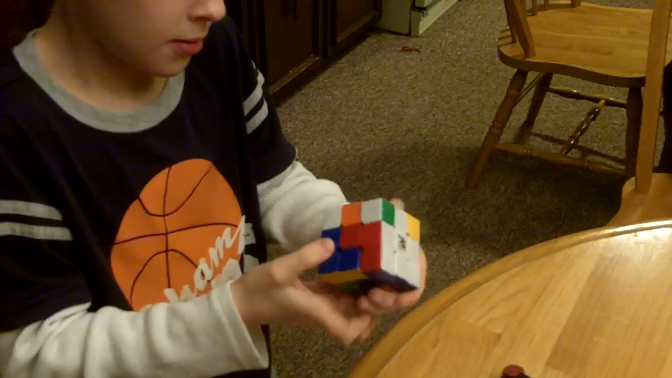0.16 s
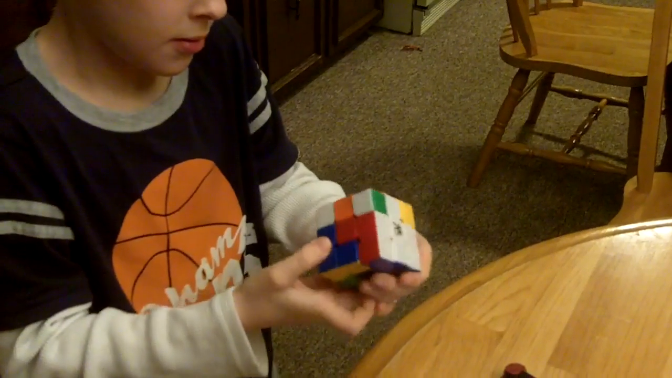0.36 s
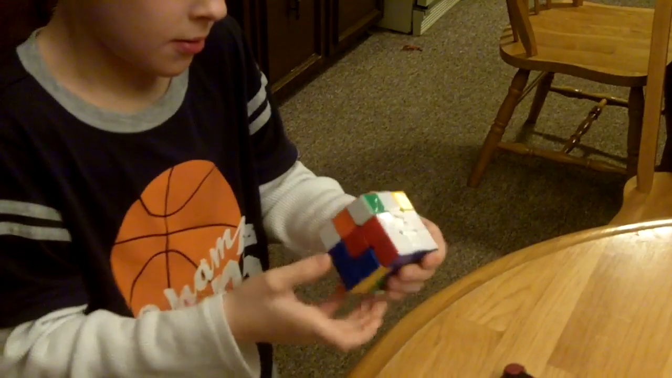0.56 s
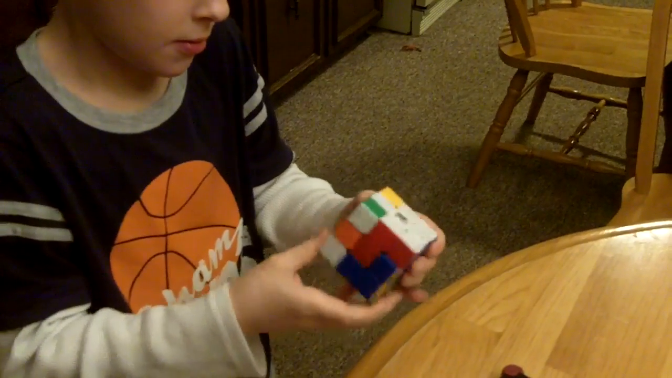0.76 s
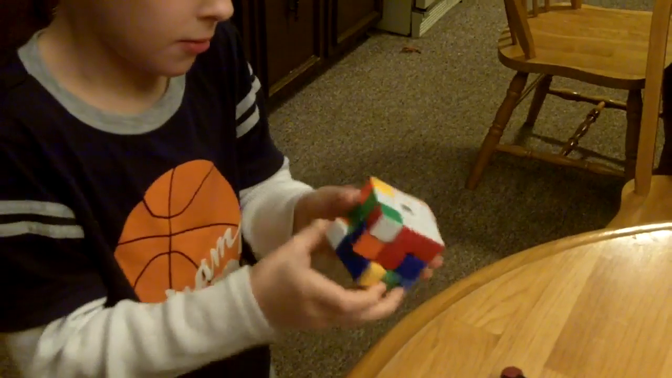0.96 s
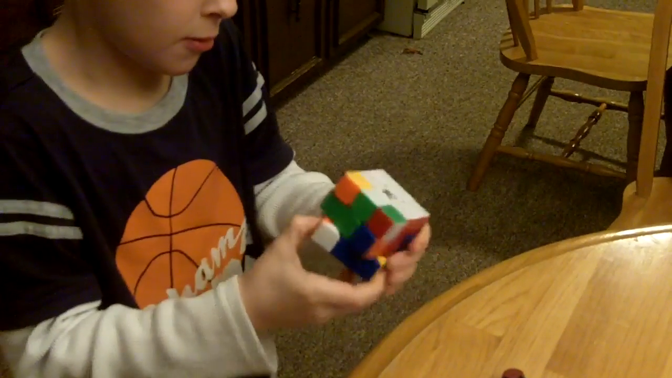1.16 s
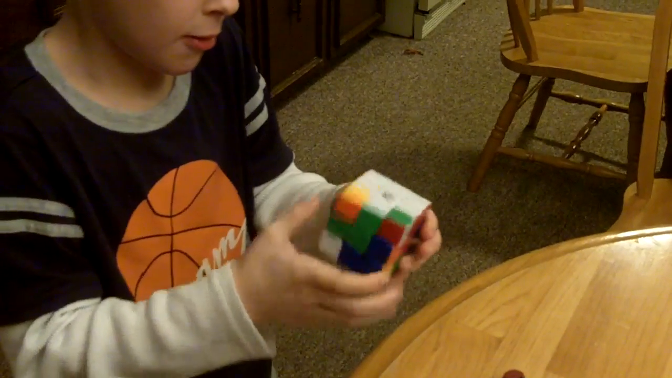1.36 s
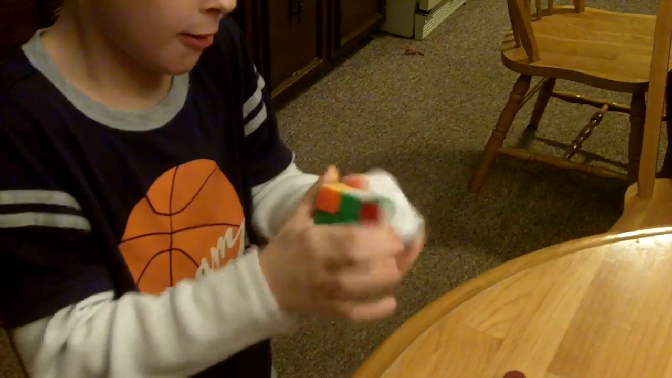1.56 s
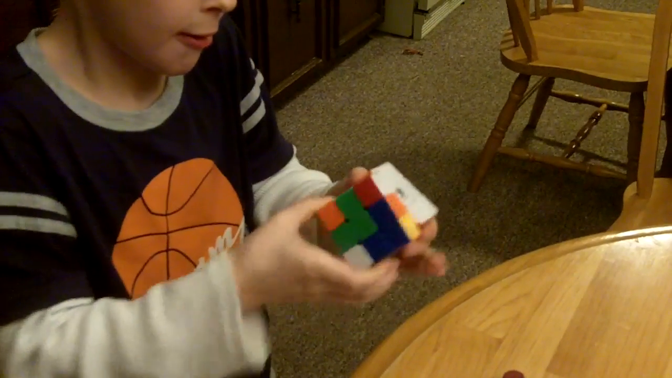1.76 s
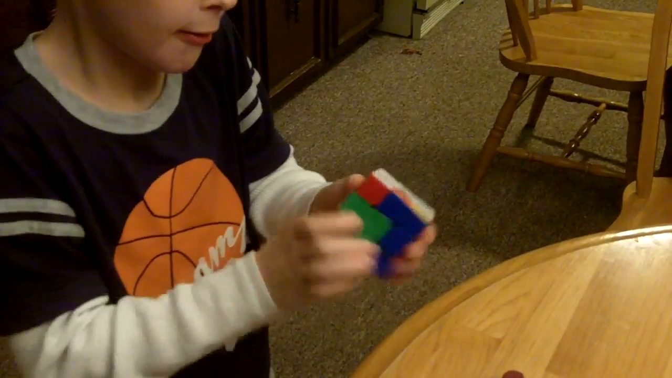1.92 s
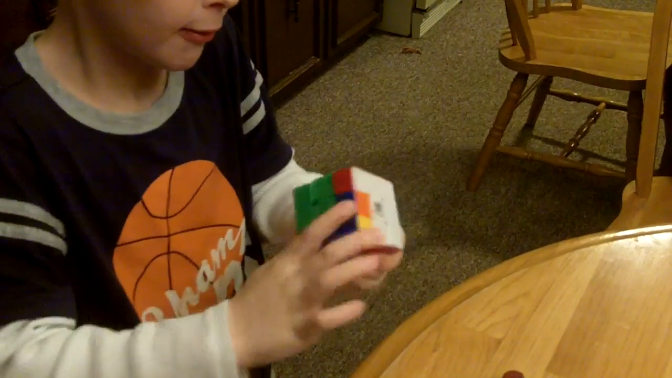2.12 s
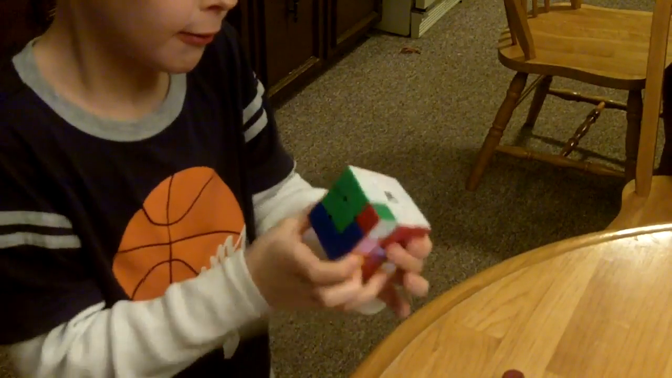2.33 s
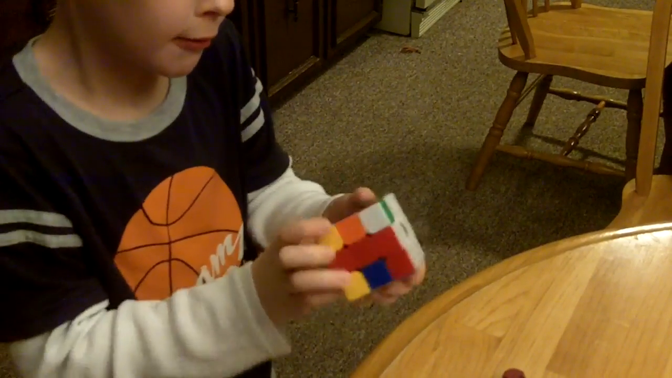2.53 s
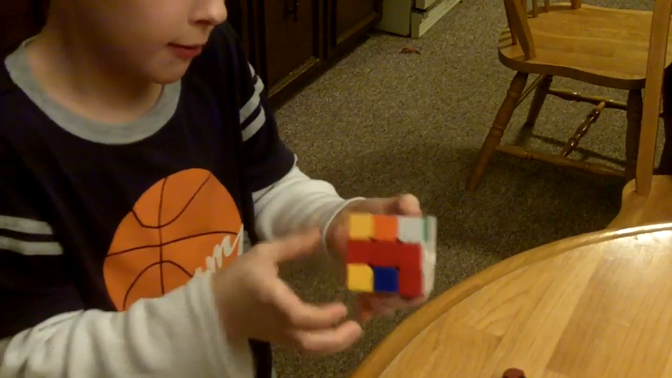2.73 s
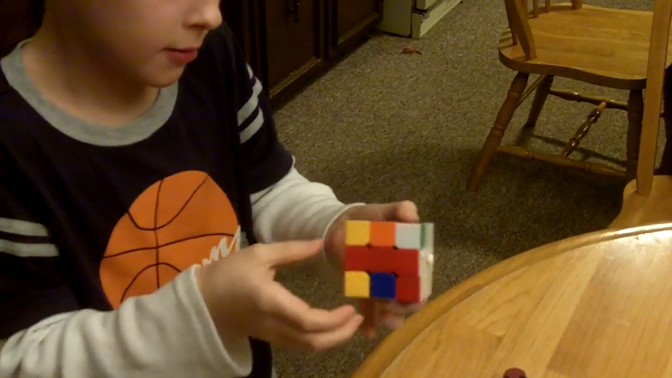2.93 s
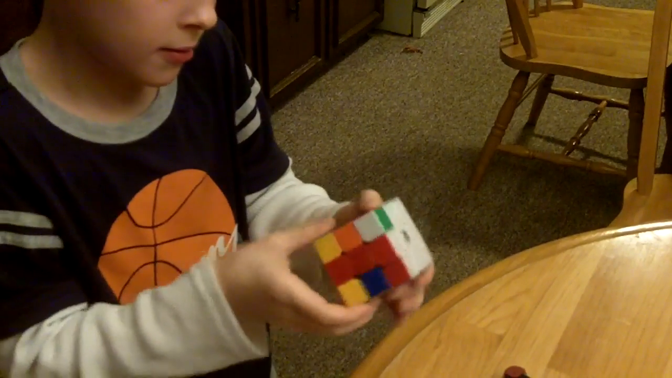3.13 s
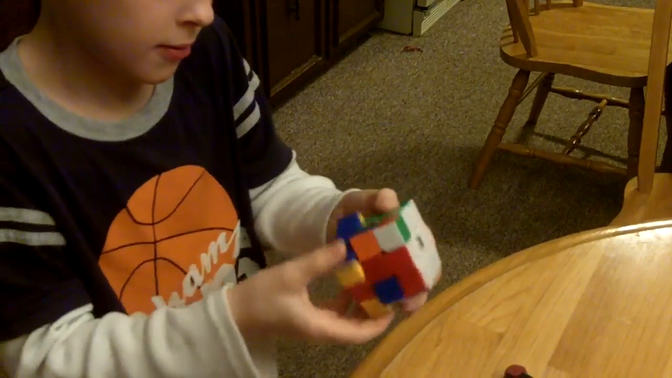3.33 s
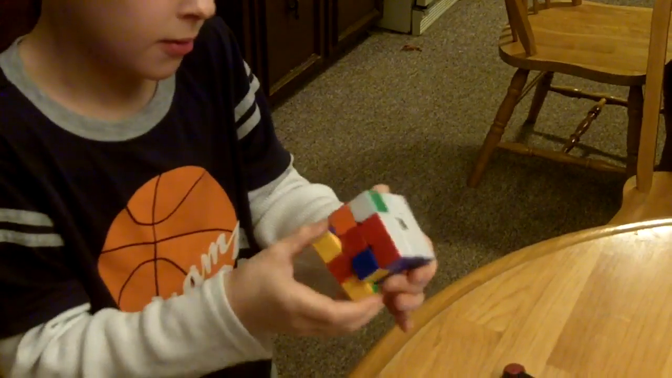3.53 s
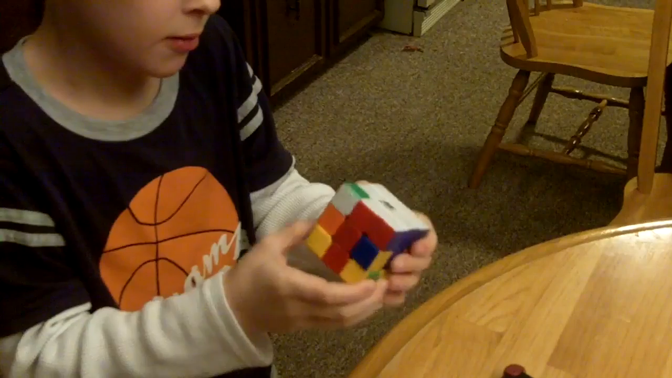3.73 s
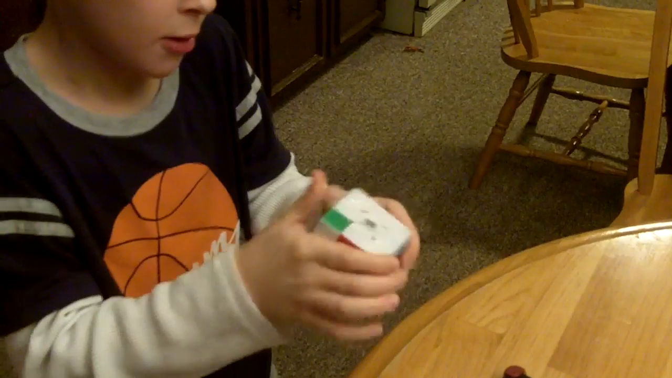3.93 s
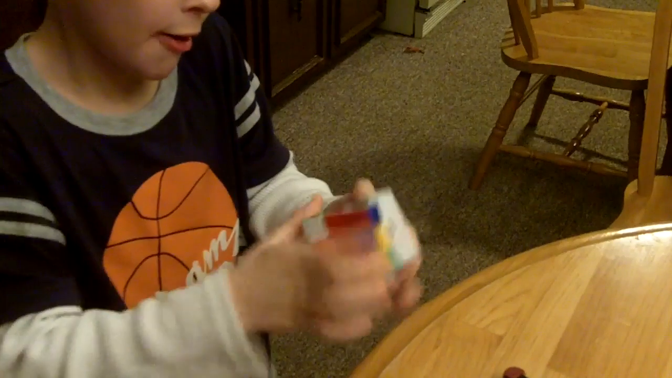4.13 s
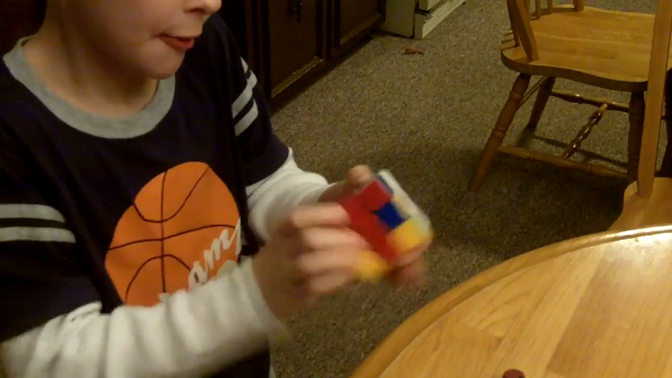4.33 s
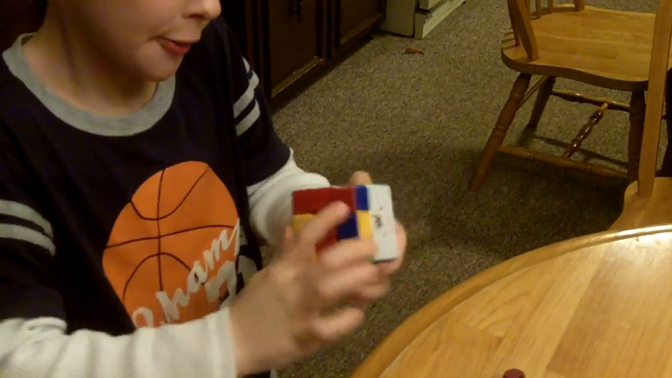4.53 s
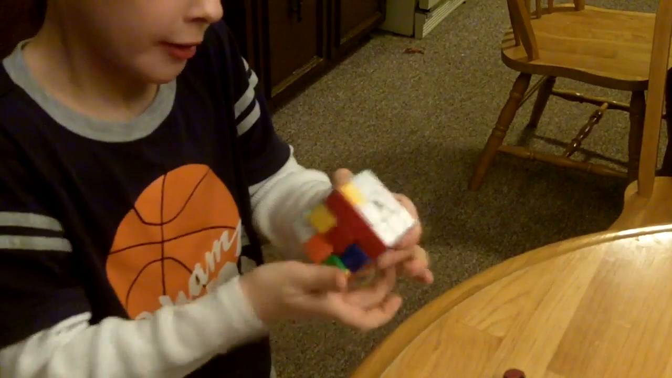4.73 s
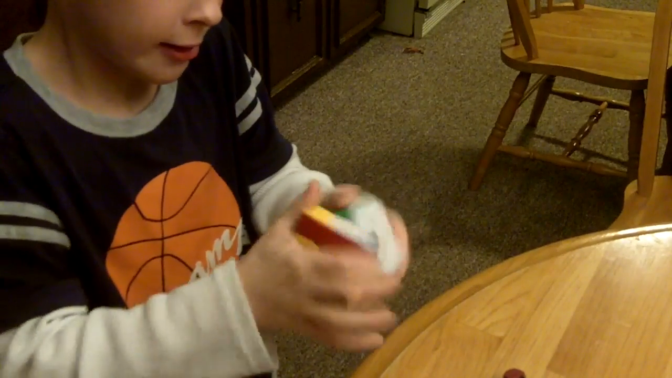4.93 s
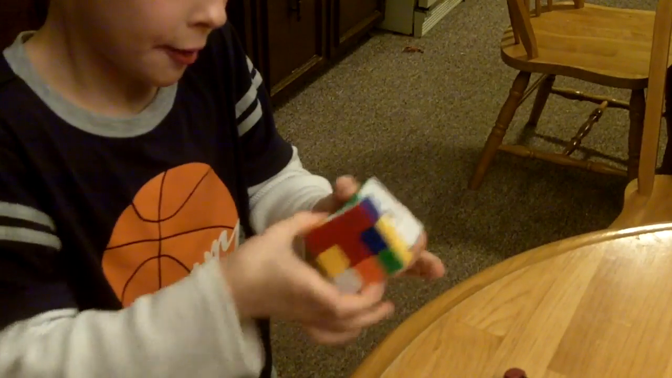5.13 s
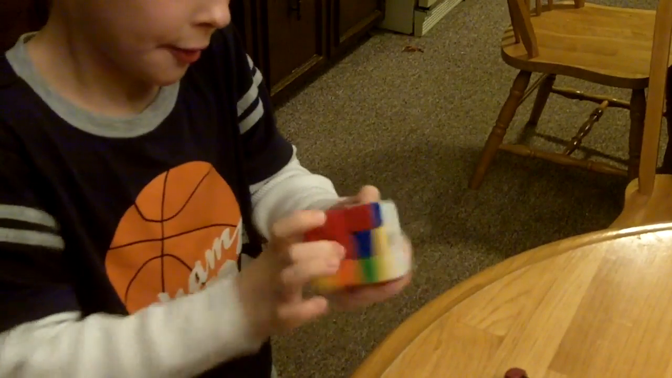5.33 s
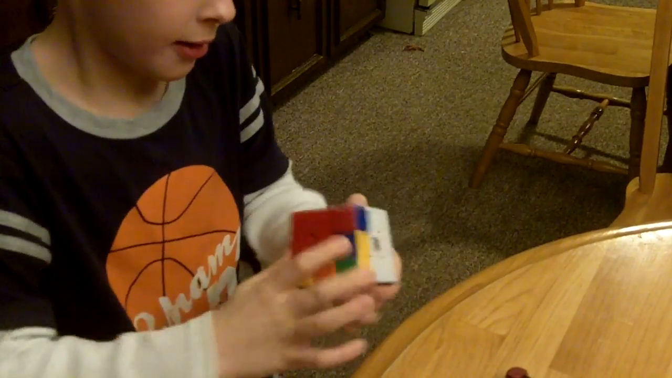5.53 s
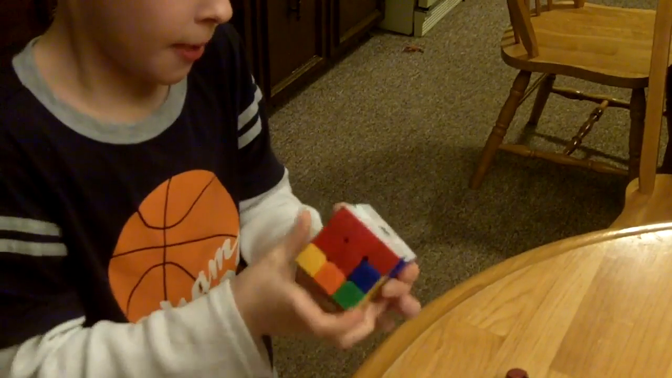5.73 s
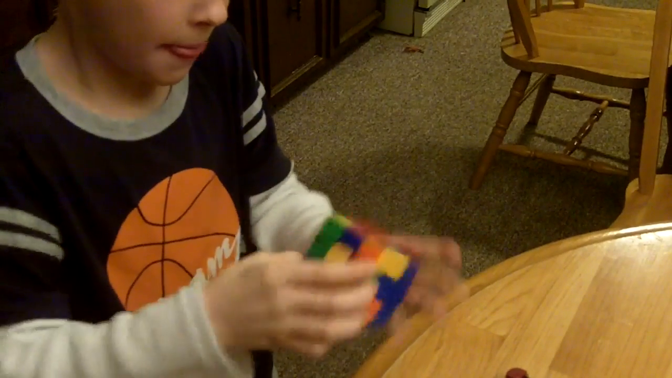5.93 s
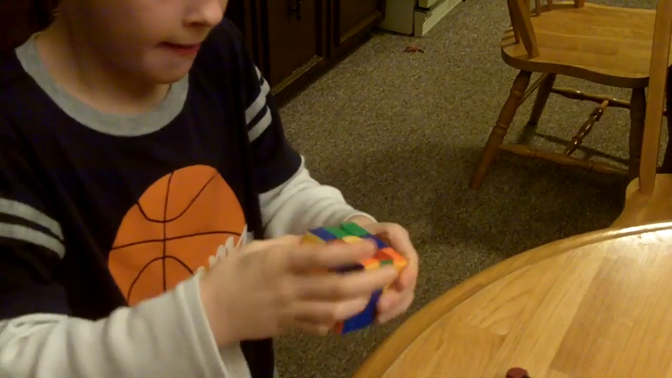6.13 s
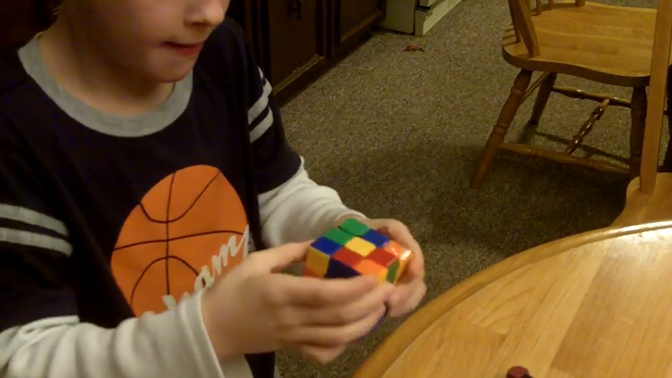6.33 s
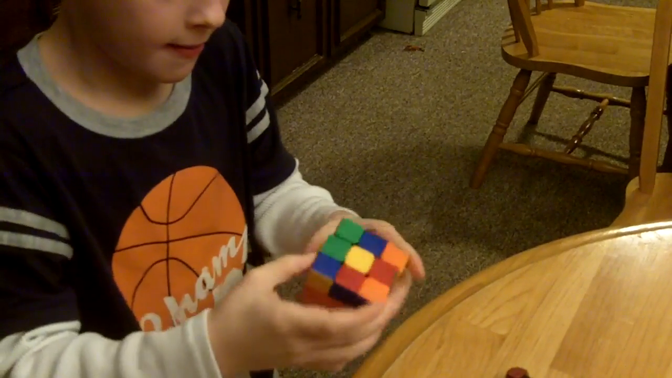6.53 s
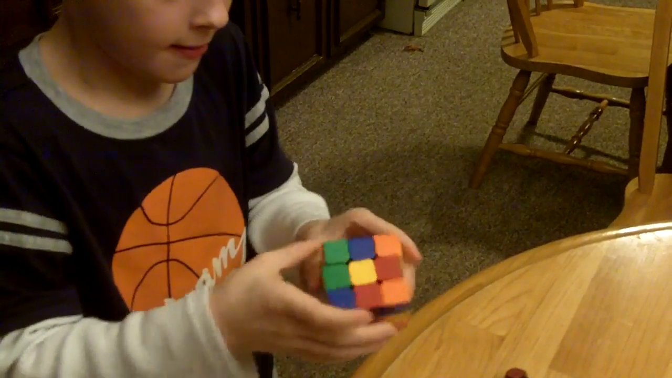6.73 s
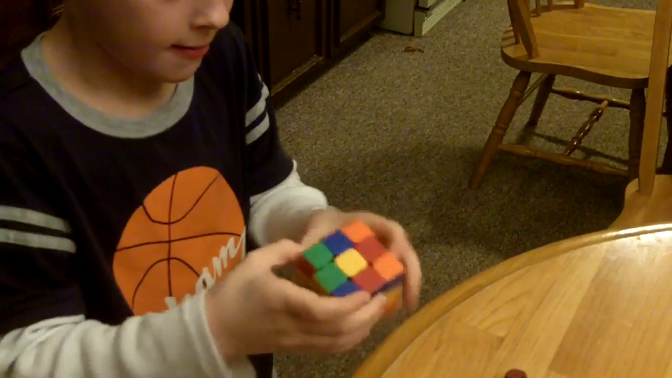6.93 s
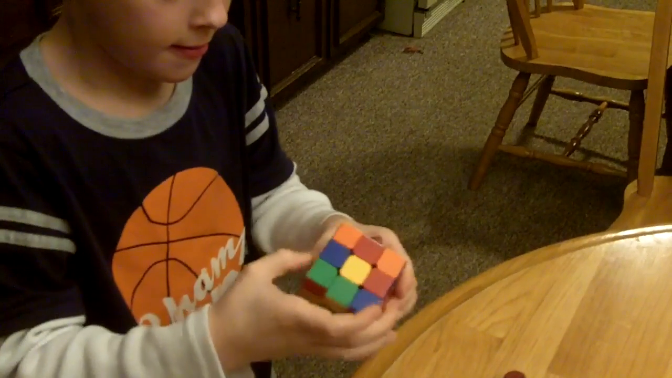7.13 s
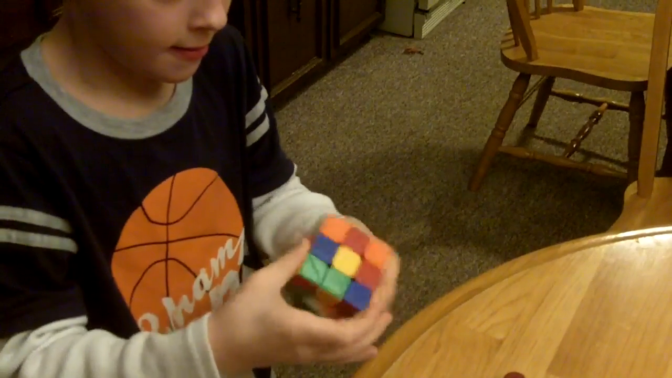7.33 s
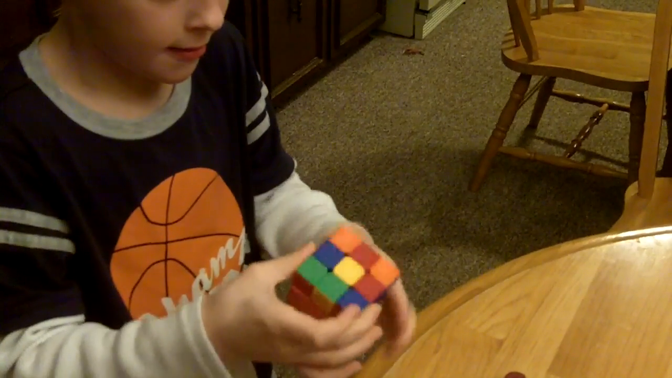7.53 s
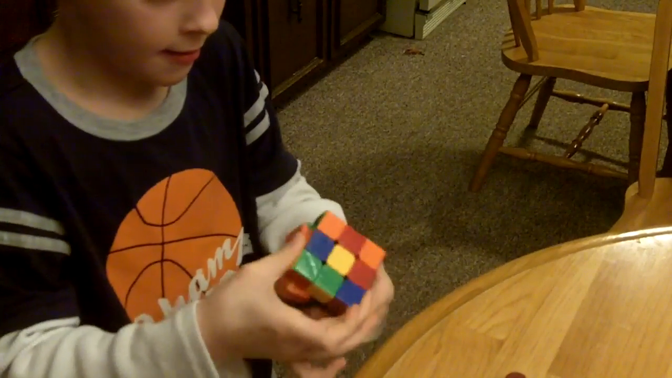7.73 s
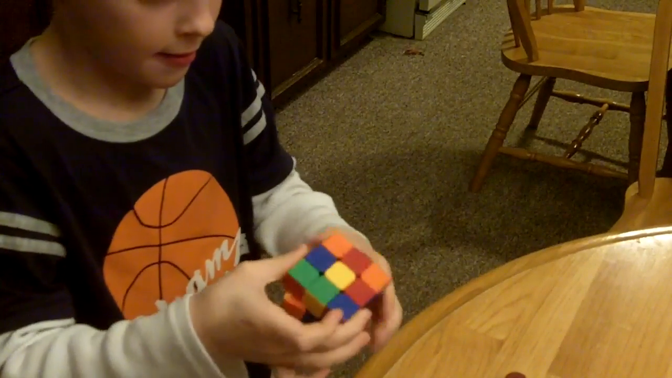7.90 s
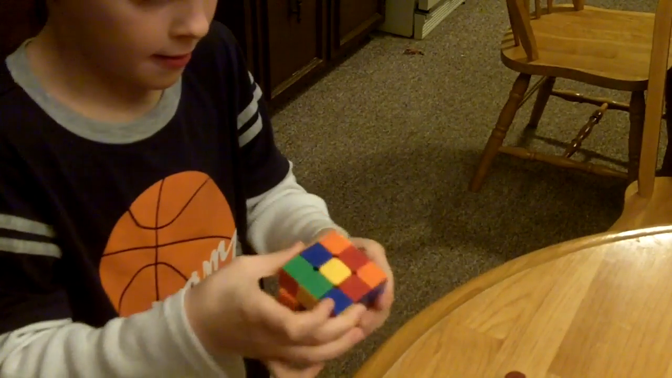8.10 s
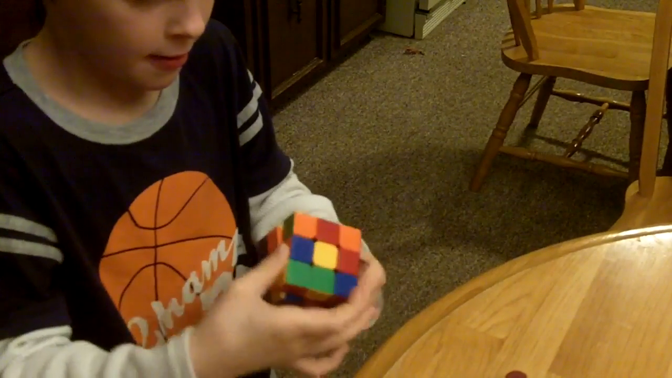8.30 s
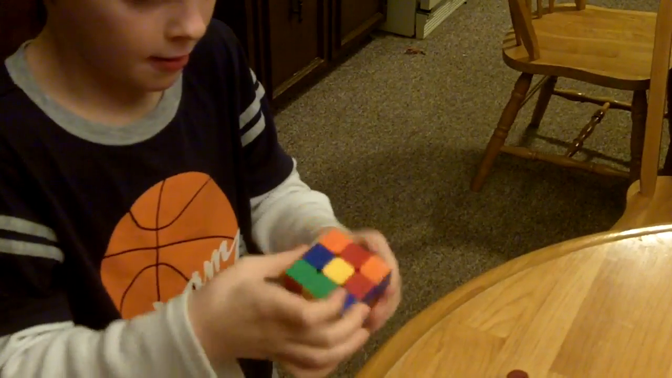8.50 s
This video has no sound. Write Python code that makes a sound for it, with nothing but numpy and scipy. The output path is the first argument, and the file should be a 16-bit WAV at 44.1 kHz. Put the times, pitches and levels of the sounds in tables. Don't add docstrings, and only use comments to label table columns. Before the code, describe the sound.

A hollow plastic puzzle cube is twisted by hand close to a small camera in a quiet carpeted room. The first second holds only faint ticks and light rubbing; small catches gather from 0.9 to 1.5. Firmer clicks come near 1.7, a hard bright snap at 2.0, and a tight crunching cluster with gritty sliding around 2.35. It thins to nearly nothing until small clicks and a dull finger bump on the casing near 3.5. From 4.1 to 5.9 a fast run of snaps and clacks rattles along, loudest around 4.8, with short gaps. Then sparse faint ticks, and a light tap on the casing at 6.15. Crisp snaps return at 7.3 and 7.5, smaller clicks at 7.85 and 8.3, and a gritty slide rises at the end. Low room rumble, faint whine and hiss remain underneath, with brief reflections.

```python
import sys
import numpy as np
from scipy import signal
from scipy.fft import rfft, irfft, next_fast_len
from scipy.io import wavfile
from scipy.ndimage import uniform_filter1d

SR = 44100
rng = np.random.default_rng(int(sys.argv[2]) if len(sys.argv) > 2 else 0)


def to_linear_factor(level_db):
    exponent = np.asarray(level_db, float) / 20
    return 10 ** exponent


def transcribe(signal):
    frames = np.atleast_2d(signal).T
    limited = np.clip(frames, -1, 1)
    pcm = np.round(limited * 32767).astype(np.int16)
    wavfile.write(sys.argv[1], SR, pcm)


N = 381906


def evened(x):
    return x / np.sqrt(np.mean(x ** 2) + 1e-20)


def read_curve(points, hz):
    point_hz, value = np.transpose(points)
    return np.interp(np.log(hz + 1), np.log(point_hz + 1), value)


def add(mix, s, sound):
    part = mix[round(s * SR):][:len(sound)]
    part += sound[:len(part)]


def causal(points, size=1024):
    hz = abs(np.fft.fftfreq(size, 1 / SR))
    log_gain = np.log(to_linear_factor(read_curve(points, hz)))
    return np.exp(np.conj(signal.hilbert(log_gain)))[:size // 2 + 1]


def noise(points, edge_hz=14950):
    bins = rfft(rng.standard_normal(next_fast_len(N)))
    hz = np.linspace(0, SR / 2, len(bins))
    db = read_curve(points, hz) - 0.12 * np.maximum(hz - edge_hz, 0)
    return evened(irfft(bins * to_linear_factor(db))[:N])


def contacts():
    # time in seconds, peak in dB, body in dB against the snap,
    # build-up in ms.
    snaps = [(1.7136, -34, -2.5, 2), (1.7625, -35, -2, 1.3), (2.029, -14.5, -26.5, 1.25),
             (2.3446, -28.5, -10, 2.3), (2.357, -24, -6.5, 0.5), (2.3677, -36.5, -1, 1.1),
             (2.3806, -25, -9.5, 0.68), (3.4426, -30, -6.5, .6), (4.1426, -20, -19, 1.54),
             (4.18, -21.5, -13.5, 0.46), (4.3948, -22, -14.5, 0.21), (4.4182, -29, -7, 1.9),
             (4.753, -21.5, -15, 0.78), (4.7576, -30.5, -11, .6), (4.766, -29, -15, 3.2),
             (4.7791, -18, -11.5, 1.2), (4.793, -32.5, -21.5, .5), (4.8363, -13.5, -14, 0.6),
             (4.8524, -33, -26.5, 0.55), (5.019, -21.5, -40.5, 0.54), (5.0577, -26, -12, 0.53),
             (5.107, -26, -11, 0.73), (5.2898, -29, -16, .5), (5.3521, -19.5, -10.5, 1.7),
             (5.7439, -27, -19, 2.3), (5.7483, -22.5, -12.5, 1.1), (5.7751, -23.5, -14, 0.53),
             (5.7859, -27, -9.5, 0.33), (7.2688, -21, -19.5, 0.29), (7.4766, -22, -20, 0.88)]
    # time in seconds, peak in dB, body in dB against the snap.
    catches = [(.042, -49, 2.5), (.9094, -40, -13), (.9617, -41.5, -2), (.997, -34.5, -8.5),
               (1.0069, -42, -10), (1.038, -39, -4), (1.0616, -45.5, -11), (1.081, -42.5, 1),
               (1.2991, -32, -20), (1.3463, -45, -11), (1.3603, -42.5, 1.5), (1.4936, -44.5, -9),
               (1.5103, -42.5, -17), (1.6444, -40, -9.5), (1.7192, -40, -9), (1.7818, -39, -9),
               (1.9037, -40, -2.5), (1.946, -35, -8), (2.0102, -44, -1.5), (2.0381, -41, -21),
               (2.2949, -37.5, -5.5), (2.3303, -43, 5.5), (2.412, -42, -6), (2.55, -39.5, -3.5),
               (2.5685, -43.5, -23), (2.7095, -38.5, -2), (3.3308, -38.5, -11), (3.5237, -36.5, -18),
               (3.5382, -37, -4), (3.897, -43, 1),
               (4.0673, -42, -5), (4.0893, -39.5, -11), (4.124, -37, -7), (4.153, -37, -25),
              (4.221, -39.5, -10), (4.2877, -36, -8), (4.2979, -37.5, -17), (4.3767, -44.5, -6),
              (4.451, -36.5, -1), (4.462, -41.5, 2), (4.505, -40.5, -8), (4.6697, -41.5, -4),
              (4.72, -31.5, -4), (4.734, -41, -5), (4.7438, -28, -11.5), (4.8058, -29, -16),
              (4.8912, -32, -15), (5.028, -37, 2), (5.044, -51, 8), (5.0984, -41, 0), (5.121, -40.5, -15),
              (5.143, -33, -7), (5.3292, -33, -11.5), (5.3424, -39, 2), (5.3654, -32, -52),
              (5.511, -42.5, -1.5), (5.669, -42.5, -3.5), (5.7246, -36, -6.5), (5.7633, -39, -10.5),
              (5.894, -33.5, -9),
               (5.9257, -40, -8), (6.0118, -42.5, -5.5), (6.1917, -36, -2.5), (6.7451, -33.5, -11),
                 (6.7803, -46.5, -1), (7.165, -46.5, -12), (7.213, -44, -2), (7.388, -46, -9),
                 (7.4326, -47, 2), (7.4405, -34, -18), (7.4544, -42, 2.5), (7.5248, -39.5, -3),
                 (7.5365, -39, -10), (7.548, -33, -9.5), (7.6153, -49, -6), (7.8088, -35, -16),
                 (7.8333, -33.5, 0.5), (7.8434, -32.5, -15), (7.854, -40, -28), (7.8857, -41, -3),
                 (8.255, -47, -12), (8.2918, -41, -4.5), (8.304, -31.5, -23), (8.3301, -31.5, -4),
                 (8.3696, -43, -1), (8.381, -45, -3), (8.3957, -35.5, -5.5), (8.616, -56.5, 11.5),
                 (8.633, -49, 7.5), (8.6452, -40, -3)]
    # time in seconds, peak in dB.
    ticks = [(0.024, -51), (0.2333, -57.5), (0.616, -63), (0.6923, -58), (1.139, -51.5), (1.4817, -52),
             (1.806, -48), (2.0195, -40.5), (2.078, -44), (2.224, -54), (2.46, -51.5), (3.307, -55),
             (3.4177, -51.5), (3.513, -46), (3.6865, -53), (3.706, -47), (3.7274, -52), (4.348, -50.5),
             (4.704, -49), (5.191, -45.5), (5.4262, -46), (6.155, -54), (6.2607, -56.5), (6.514, -50.5),
             (6.9452, -60), (7.0212, -53), (7.9171, -48.5), (7.974, -54), (8.5107, -53.5), (8.5715, -51.5),
             (0.074, -63), (0.155, -60), (.292, -62), (.495, -63), (.628, -61.5), (0.829, -59),
             (0.9707, -53), (1.276, -69), (2.0014, -49), (3.4037, -57), (4.0967, -54), (4.404, -46),
             (4.564, -58), (4.8165, -42), (4.8778, -41), (4.929, -47.5), (5.274, -54.5), (5.4432, -48.5),
             (5.5902, -57.5), (5.6467, -46), (5.957, -52.5), (6.3114, -58), (6.5952, -58.5), (6.688, -58),
             (7.417, -52), (7.4455, -45), (7.6835, -58.5), (7.799, -55), (8.096, -60.5), (8.2853, -52)]
    low_body = (-.5, 1.31)
    mid_body = (0.96, 0.6)
    tick_body_db = 2.5
    typical_ms, ms_spread = 0.84, 0.63

    lesser = catches + [(s, db, tick_body_db) for s, db in ticks]
    chance_ms = typical_ms * np.exp(ms_spread * rng.standard_normal(len(lesser)))
    rows = snaps + [(*row, ms) for row, ms in zip(lesser, chance_ms)]
    s, peak_db, body_db, ms = np.transpose(rows)
    low_db = low_body[0] + low_body[1] * body_db
    mid_db = mid_body[0] + mid_body[1] * body_db
    return s, peak_db, low_db, mid_db, ms


def clicks(crack_db=-2, fall_ms=0.87, size=1024, count=16):
    # lowest and highest mode in Hz, t60 in seconds, level in dB.
    shell = [
        (1082, 2305, 0.012, -3),
        (2440, 6640, 0.0059, 4.5),
        (6610, 7470, 0.0046, 0.5),
    ]
    # frequency in Hz, level in dB.
    crack_tone = [(300, -74.5), (1000, -20.5), (5000, -7.5), (7300, 5), (9500, -11.5), (12000, -20),
                  (14500, -37.5), (16500, -79.5)]
    # frequency in Hz, level in dB.
    smallness = [(100, -67), (500, -17), (1000, -9.5), (1500, -1), (9500, 2), (13000, -9.5), (16500, -34)]

    s, peak_db, low_db, mid_db, ms = contacts()
    family_db = (low_db, mid_db, 0 * s)
    t = np.arange(size) / SR
    lead = t[size // 4]
    draws = rng.random((len(s), size + 9 * count))
    rise = np.clip(ms, 0.1, 4)[:, None] / 1000
    growth = 0.55 * (t - lead) / rise
    decay = (lead - t) / (fall_ms / 1000 + 1.1 * rise)
    swell = np.exp(np.minimum(growth, decay))
    impacts = (2 * draws[:, :size] - 1) ** 3 * swell
    chatter = rfft(impacts + 2.16 * (t == lead))

    mode_draws = draws[:, size:].reshape(len(s), 3, 3, count, 1)
    where, sign, weight = mode_draws.transpose(1, 2, 0, 3, 4)
    sound = np.zeros((len(s), size))
    for k, (low_hz, high_hz, t60, db) in enumerate(shell):
        place = (np.arange(count)[:, None] + where[k]) / count
        hz = low_hz * (high_hz / low_hz) ** place
        strength = np.sign(sign[k] - 0.06) * (0.24 + weight[k])
        modes = (strength * np.sin(2 * np.pi * hz * t)).sum(1)
        ring = irfft(chatter * rfft(modes * to_linear_factor(-60 * t / t60)) * causal(smallness))
        ring /= abs(ring).max(1, keepdims=True)
        sound += ring * to_linear_factor(db + family_db[k])[:, None]
    crack = irfft(chatter * causal(crack_tone))
    sound += to_linear_factor(crack_db) * crack / abs(crack).max(1, keepdims=True)

    out = np.zeros(N)
    for at, db, click in zip(s, peak_db, sound):
        add(out, at - lead - 0.0004, to_linear_factor(db - 3.0) * click)
    return out


def effort_db():
    # greatest effort in seconds, level in dB, speed-up and slow-down in seconds.
    twists = [(.04, -63, 0.041, 0.042), (1.01, -66, .04, 0.38), (1.36, -58.5, 0.075, 0.038),
              (1.5, -83, .05, .1), (1.718, -48, .045, 0.13), (2.04, -56, 0.15, 0.18),
              (2.358, -38, 0.028, 0.039), (2.56, -63, 0.093, 0.11), (2.72, -71, 0.1, .02),
              (3.34, -60.5, .015, 0.059), (3.53, -57.5, 0.09, .06), (3.7, -64.5, 0.19, 0.026),
              (3.91, -68, 0.042, 0.11), (4.13, -53, .07, 0.25), (4.41, -53, 0.013, 0.16),
              (4.565, -66.5, .02, 0.039), (4.77, -51.5, 0.1, 0.13), (5.1, -51, 0.2, 0.089),
              (5.36, -62, 0.32, 0.29), (5.6, -71, .04, .05), (5.749, -53.5, 0.11, .13),
              (6.2, -60, .016, .05), (6.76, -67.5, .04, 0.3), (7.29, -74, .04, 0.27),
              (7.49, -58, 0.059, 0.19), (7.66, -63, 0.066, .05), (7.85, -54.5, 0.058, 0.12),
              (8.2, -65.5, 0.037, 0.035), (8.34, -51.5, 0.088, 0.056), (8.66, -46, 0.0648, .1)]
    t = np.arange(N) / SR
    level_db = np.full(N, -85.0)
    for s, db, rise, fall in twists:
        distance = np.maximum((s - t) / rise, (t - s) / fall)
        level_db = np.maximum(level_db, db - 20 * distance)
    return level_db


def slide(grains_per_s=1500, spread_db=8, smooth=0.23):
    # frequency in Hz, level in dB.
    grit_tone = [(300, -53), (700, -36), (1200, -13), (3000, -15), (4800, -11), (7300, -6.5),
                 (10500, -20.5), (15500, -47)]
    size_db = spread_db * np.minimum(rng.exponential(1, N), 3)
    slips = (rng.random(N) < grains_per_s / SR) * to_linear_factor(size_db)
    rub = smooth * rng.standard_normal(N)
    drive = evened(slips * rng.choice([-1., 1.], N)) + rub
    grit = evened(signal.oaconvolve(drive, irfft(causal(grit_tone)))[:N])
    return grit * to_linear_factor(effort_db() - 1.0)


def room(x, first_s=0.007):
    # frequency in Hz, t60 in seconds.
    decay = [(500, 0.6), (2000, 0.21), (7000, 0.2), (14000, 0.056)]
    taps = np.zeros(SR // 2)
    at = np.arange(round(first_s * SR), SR // 2 - 20, 20)
    at = at + rng.integers(0, 20, len(at))
    taps[at] = rng.choice([-1., 1.], len(at))
    hz, t, bands = signal.stft(taps, SR, nperseg=128)
    t60 = read_curve(decay, hz)[:, None]
    tail = signal.istft(bands * to_linear_factor(-60 * t / t60), SR, nperseg=128)[1]
    return signal.fftconvolve(x, tail / np.linalg.norm(tail))[:N]


def knocks():
    # time in seconds, peak in dB, ring in Hz, t60 in seconds, push in dB.
    bumps = [
        (3.48, -48.5, 410, 0.046, -43),
        (6.154, -52.5, 720, 0.035, -65),
        (6.166, -62, 438, 0.028, -71),
    ]
    out = np.zeros(N)
    t = np.arange(3000) / SR
    u = t / 0.0019
    for s, db, hz, t60, push_db in bumps:
        ring = to_linear_factor(db - 60 * t / t60) * np.sin(2 * np.pi * hz * t)
        push = to_linear_factor(push_db) * u * (2 - u) * np.exp(-u)
        add(out, s, -ring - push)
    return out


def room_tone():
    # frequency in Hz, level in dB.
    air = [(15, -1), (40, 0), (120, -2.5), (300, -5.5), (700, -13.5), (1500, -19), (3000, -24.5),
           (5000, -33.5), (7200, -21.5), (9000, -29.5), (12300, -27.5), (14000, -29)]
    return to_linear_factor(-68) * noise(air)


def whines():
    whine_hz = [120, 3056, 3086, 3026, 6112, 6142, 7195, 7867, 8550, 10950]
    whine_db = [-82.5, -93, -96, -96, -91.5, -91, -94, -86, -100, -100]
    t = np.arange(N) / SR
    waver = 1 + 0.2 * evened(uniform_filter1d(rng.standard_normal(N), 4000))
    tones = np.zeros(N)
    for hz, db in zip(whine_hz, whine_db):
        tones += np.sqrt(2) * to_linear_factor(db) * np.sin(2 * np.pi * (hz * t + rng.random()))
    return waver * tones


def circuit_hiss():
    # frequency in Hz, level in dB.
    hiss_tone = [(15, 6.5), (60, -2.5), (300, -14), (1000, -20), (3000, -24), (5500, -28), (8000, -23),
                 (11000, -23), (14500, -22.5)]
    return to_linear_factor([[-71], [-75]]) * np.array([noise(hiss_tone), noise(hiss_tone)])


def notched(x):
    # Centre, skirt width and floor width, all in Hz.
    notch = (5490, 1100, 30)
    hz, skirt_hz, floor_hz = notch
    pole, zero = np.exp(-np.pi * skirt_hz / SR), np.exp(-np.pi * floor_hz / SR)
    turn = -2 * np.cos(2 * np.pi * hz / SR)
    return signal.lfilter([1, turn * zero, zero ** 2], [1, turn * pole, pole ** 2], x)


def scene():
    cube = clicks() + slide()
    near = cube.copy()
    add(near, 0.0125, to_linear_factor(-14) * cube)
    mono = near + to_linear_factor(-11.5) * room(cube) + knocks() + room_tone() + whines()
    return np.array([mono, mono])


def low_pass(x):
    return signal.sosfilt(signal.butter(12, 16140, fs=SR, output="sos"), x)


def record(dry):
    offset = [
        [.00129],
        [.00026],
    ]
    mix = notched(dry + circuit_hiss()) + offset
    return low_pass(mix)


dry = scene()
out = record(dry)
transcribe(out)
```